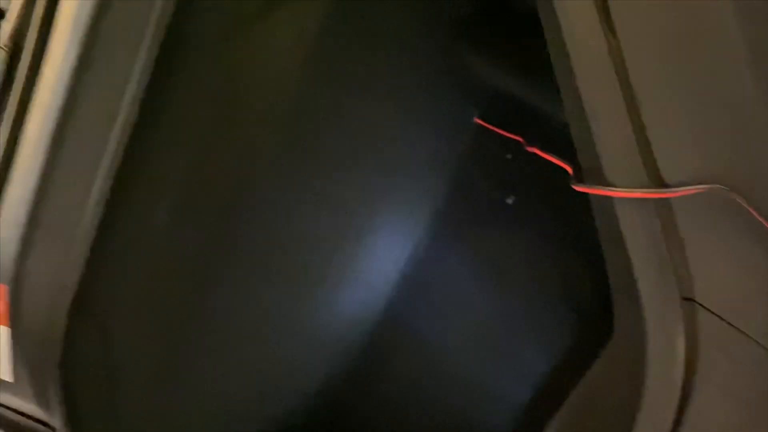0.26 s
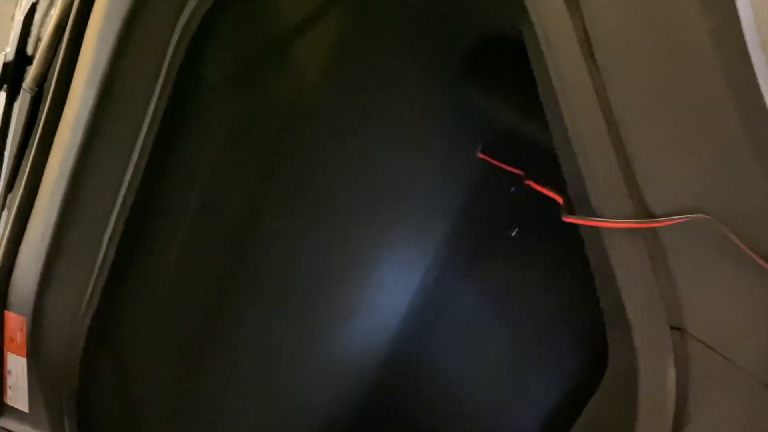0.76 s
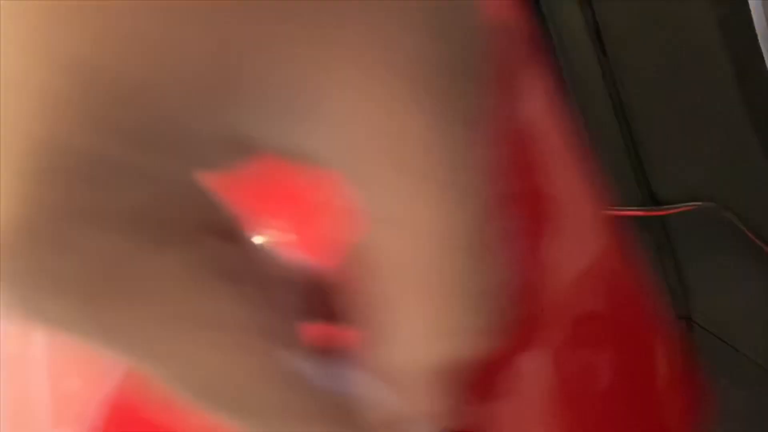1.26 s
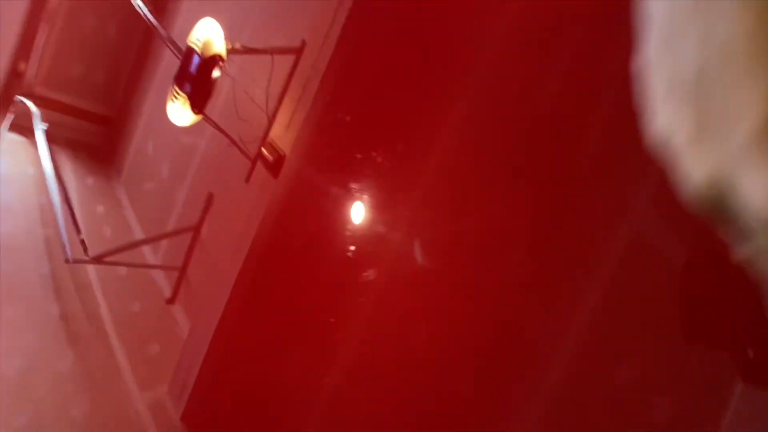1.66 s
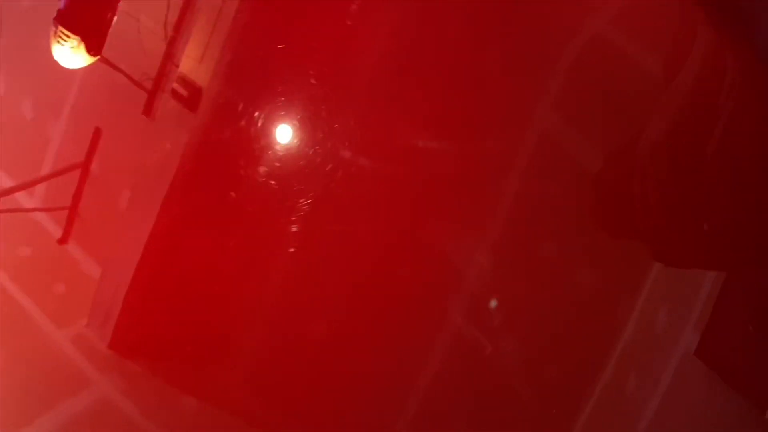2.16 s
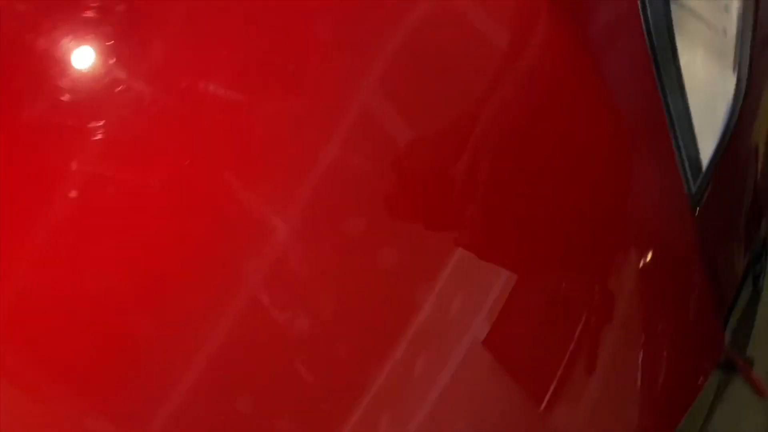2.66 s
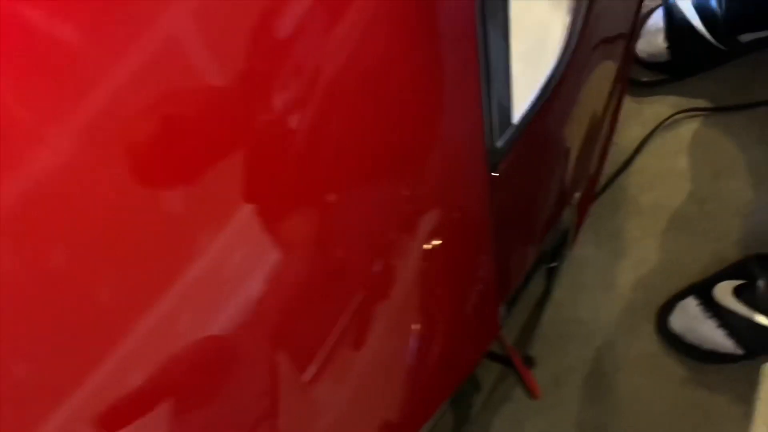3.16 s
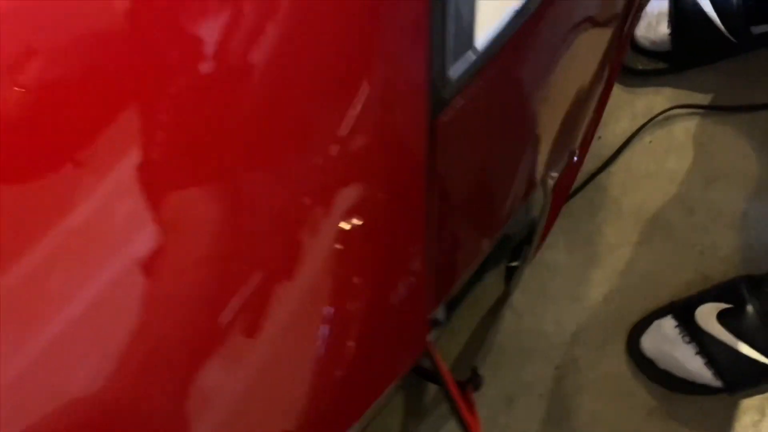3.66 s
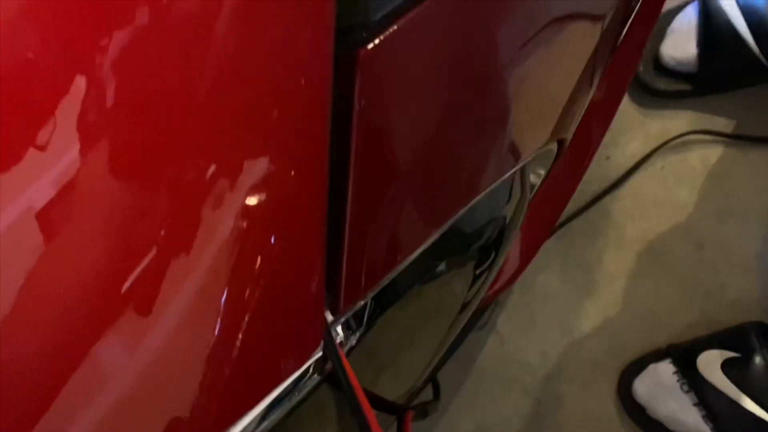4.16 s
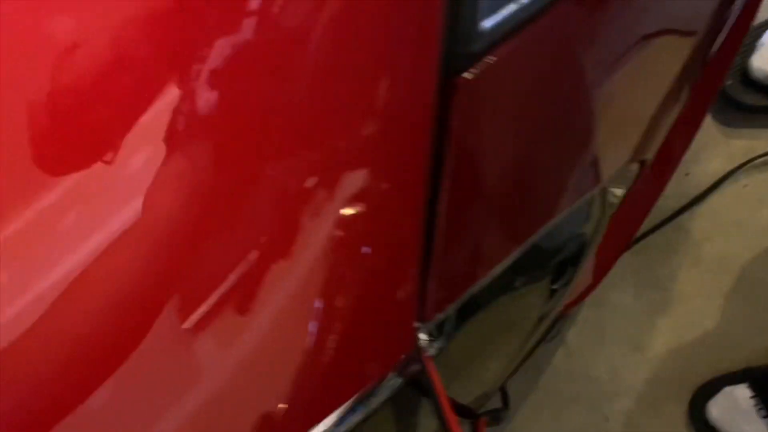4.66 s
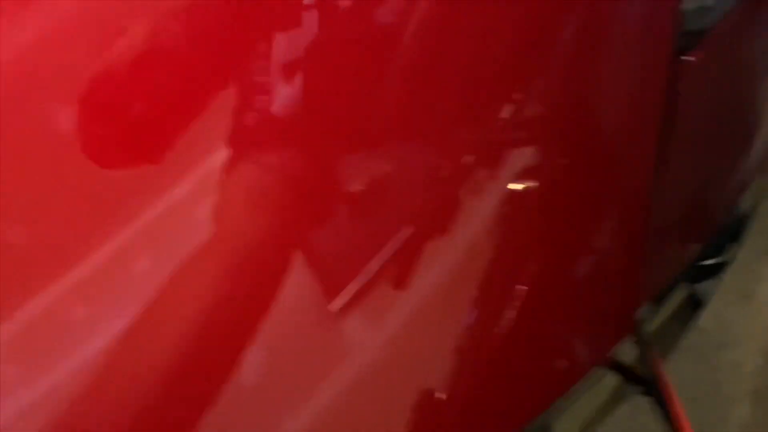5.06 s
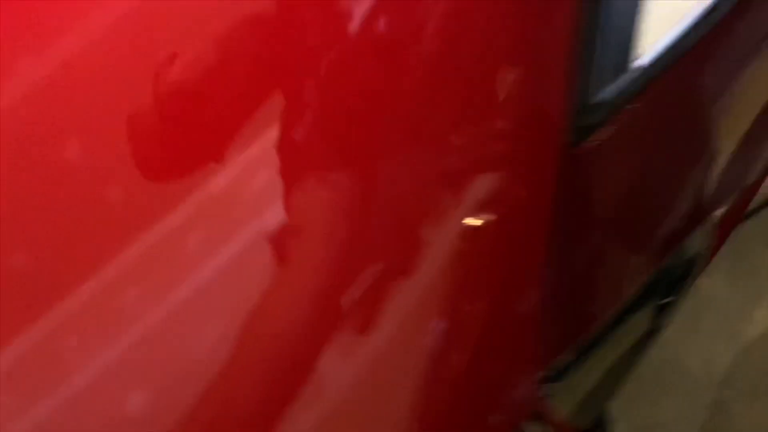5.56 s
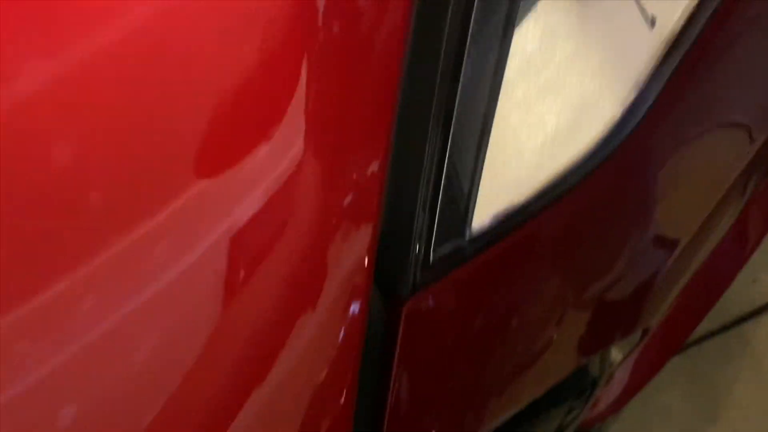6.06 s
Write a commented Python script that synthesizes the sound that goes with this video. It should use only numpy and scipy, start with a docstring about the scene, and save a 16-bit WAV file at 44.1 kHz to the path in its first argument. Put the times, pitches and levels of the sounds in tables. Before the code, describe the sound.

Close, hand-held stereo sound beside a car in a reverberant garage: quiet movement and light knocks, then a bright metal clack as the heavy lid falls, with bouncing thuds and thin sheet-metal ringing. A quieter middle has sleeve hiss, soft low bumps and dry ticks on the microphone. A deeper double latch slam follows, rattling and humming briefly, before one last weaker, dull panel knock and small scuffs.

```python
"""A heavy sheet-metal car lid in a garage, heard from arm's length: it drops onto its catch,
is pushed home with a latch clack and a deep thunk, and takes one more dull knock.
The lid is a sum of damped modes with a noise thud; clacks, taps and ticks are decaying coloured noise.
Clothing, shuffling, low rumble and narrow noise bands swell in bells; fingers bump the hand-held
microphone as gliding sines, and a decaying noise response stands for the garage."""
import sys
import numpy as np
from scipy import signal
from scipy.fft import rfft, irfft
from scipy.io import wavfile
from scipy.ndimage import uniform_filter1d

SR = 44100
rng = np.random.default_rng(int(sys.argv[2]) if len(sys.argv) > 2 else 0)


def persist_wave(psi):
    """Save psi, clipped to +-1, as 16-bit WAV."""
    counts = np.round(np.clip(psi, -1, 1) * 32767).astype(np.int16)
    wavfile.write(sys.argv[1], SR, np.atleast_2d(counts).T)


N = 277830  # length in samples


def undb(db):
    """Logarithmic level: decibels to amplitude gain."""
    return 10 ** (np.asarray(db) / 20)


def over_pitch(hz, points):
    """Spectral interpolation: join (Hz, value) points on a log-frequency axis."""
    at, value = np.transpose(points)
    return np.interp(np.log(np.maximum(hz, 1)), np.log(at), value)


def seconds(length):
    """Uniform sampling: the time axis of the given length."""
    return np.arange(int(length * SR)) / SR


def add(out, start_s, sound):
    """Superposition: mix a sound in at its start time."""
    start = int(start_s * SR)
    part = sound[..., :N - start]
    out[:, start:start + part.shape[-1]] += part


def fade(t, t60):
    """Exponential damping: free decay, 60 dB down after t60."""
    return np.exp(-np.log(1000) * t / t60)


def onset(t, rise_s):
    """Exponential build-up: approach full level with time constant rise_s."""
    return 1 - np.exp(-t / rise_s)


def sweep(hz):
    """Phase accumulation: a sine that follows a changing frequency."""
    return np.sin(2 * np.pi * np.cumsum(hz) / SR)


# Long waves reach both microphone ports alike: pitch_hz [Hz], side_minus_mid_db [dB]
PORT_WIDTH = [(60, -18), (125, -7.5), (250, -9), (500, -4), (1000, 0), (2000, -5), (8000, -1)]


def port_noise(size):
    """Spatial coherence: frequencies and spectra of white noise as the two ports hear it."""
    hz = np.maximum(np.arange(size // 2 + 1) * SR / size, 10)
    mid, side = rfft(rng.standard_normal((2, size)))
    width = undb(over_pitch(hz, PORT_WIDTH))
    return hz, np.array([mid + width * side, mid - width * side]) / np.sqrt(1 + width ** 2)


def noise(size, *colours):
    """Spectral shaping: stereo noise whose level per octave is the sum of the given colours."""
    hz, spectrum = port_noise(size)
    db = sum(over_pitch(hz, colour) for colour in colours)
    equal_octaves = np.sqrt(SR / (2 * np.log(2) * hz))
    return irfft(spectrum * undb(db) * equal_octaves, size)


def flutter(rate):
    """Random modulation: a new random level every 1 / rate s, joined by straight slopes."""
    hold = int(SR / rate)
    steps = np.repeat(rng.standard_normal(N // hold + 1), hold)
    return uniform_filter1d(steps, hold)[:N]


ATTACK_SHARE = .54  # share of a swell's length spent rising


def swells(table, rest_db):
    """Power addition: bell-shaped (s, length, dB) swells rise over the resting level, in dB."""
    t, power = np.arange(N) / SR, undb(rest_db) ** 2
    for peak_s, length_s, db in table:
        width = length_s * np.where(t < peak_s, ATTACK_SHARE, 1 - ATTACK_SHARE)
        power = power + undb(db) ** 2 * np.exp(-2 * ((t - peak_s) / width) ** 2)
    return 10 * np.log10(power)


RING_DB, RING_WIDTH_OCTAVES = 8.5, .3  # how far a contact's own pitch stands out, half-width of its peak


def clicks(table, colour, rise_s, body_hz=450, clack_hz=1800, snap_hz=6500, ripple_db=2.5, count=160):
    """Modal density: a burst of many modes in uneven peaks, around its own pitch if it has one."""
    out, t = np.zeros((2, N)), seconds(1 / 4)
    ripple_hz = np.geomspace(300, 16000, count)
    width = 2 ** RING_WIDTH_OCTAVES
    for start_s, body_db, clack_db, snap_db, t60, *pitch in table:
        hardness = [(body_hz, body_db), (clack_hz, clack_db), (snap_hz, snap_db)]
        ripple = np.column_stack([ripple_hz, ripple_db * (rng.standard_normal(count) - .5)])
        peak = [[(hz / width, 0), (hz, RING_DB), (hz * width, 0)] for hz in pitch]
        crowd = noise(len(t), colour, hardness, ripple, *peak)
        add(out, start_s, crowd * fade(t, t60) * onset(t, rise_s))
    return out


def chirps(table, settle_s, rise_s):
    """Frequency glide: a damped swing moves from its first pitch to its settled one."""
    out, t = np.zeros((2, N)), seconds(1 / 2)
    for start_s, db, first_hz, settled_hz, t60 in table:
        hz = settled_hz + (first_hz - settled_hz) * np.exp(-t / settle_s)
        add(out, start_s, undb(db) * sweep(hz) * fade(t, t60) * onset(t, rise_s))
    return out


def rattle(start_s, body_db, clack_db, snap_db, spread_s=.4, fall_db_per_s=62, t60=.05,
           low_hz=250, high_hz=3000, count=18):
    """Energy loss: contacts at uneven moments, each at its own pitch, tending to weaken with time."""
    moment, weakness, size = rng.random((count, 3)).T
    age = spread_s * (np.arange(count) + moment + 1) / count
    weaker_db = fall_db_per_s * age + 10 * weakness
    pitch = low_hz * (high_hz / low_hz) ** size
    return [(start_s + a, body_db - w, clack_db - w, snap_db - w, t60, hz)
            for a, w, hz in zip(age, weaker_db, pitch)]


def ringing(sound, modes):
    """Resonance: a sound plus the modes that it sets ringing; each port hears them in its own phase."""
    t, response = seconds(1), 0
    for (hz, db, t60), turn in zip(modes, rng.standard_normal(len(modes))):
        port_phase = turn / 2 * np.array([[1], [-1]])
        mode = fade(t, t60) * np.sin(2 * np.pi * hz * t + port_phase)
        response = response + undb(db) * mode * np.sqrt(hz / SR / np.sum(mode[0] ** 2)) * 2
    return sound + signal.fftconvolve(sound, response, axes=1)[:, :N]


# Low rumble swells: shifts of the grip, and at 4.9 s air pushed by the closing lid:
# peak_s [s], length_s [s], level_db [dB, before its colour]
RUMBLE_SWELLS = [(.54, 0.11, -55.5), (.87, 0.18, -56), (1.59, 0.31, -56.5), (2.6, 0.35, -61.5),
                 (3.23, 0.16, -50.5), (3.72, 0.23, -57.5), (4.15, 0.29, -57.5), (4.9, 0.096, -45.5),
                 (5.86, 0.49, -54)]
# Colour of the low rumble: pitch_hz [Hz], level_db [dB per octave]
RUMBLE_COLOUR = [(20, -19.5), (40, 1.5), (60, 5), (110, 1.5), (200, -13), (400, -38), (1000, -63)]
# Shuffles of feet and body beside the car: peak_s [s], length_s [s], level_db [dB, before its colour]
SHUFFLES = [(.3, 1, -58.5), (1.08, 0.54, -59.5), (1.7, 1, -65.5), (2.6, 0.12, -60.5), (3.19, 0.1, -67),
            (3.52, 0.36, -71.5), (4.7, 0.11, -86), (5.87, 0.27, -58)]
# Colour of the shuffles: pitch_hz [Hz], level_db [dB per octave]
SHUFFLE_COLOUR = [(60, -24.5), (180, -3.5), (270, 0.5), (450, -1), (700, -0.5), (1000, -6.5), (1350, -10),
                  (1520, -11.5), (2000, -11.5), (2300, -14), (5000, -22.5), (16000, -45)]
# Strokes of clothing near the microphone, levels before their colours:
# peak_s [s], length_s [s], fine_sleeve_hiss_db [dB], coarser_rub_db [dB]
STROKES = [(.1, 0.96, -78, -96), (1.002, 0.42, -84, -69), (1.504, 0.17, -91, -76), (2.297, 0.5, -67, -85),
           (2.51, 0.2, -60, -64), (2.621, 0.058, -60, -59), (2.78, 0.3, -69.5, -72.5),
           (3.169, 0.46, -78, -75), (3.515, 0.16, -70, -69.5), (3.733, 0.29, -66.5, -72),
           (4.02, 0.12, -67.5, -72.5), (4.313, .04, -81, -74), (4.353, 0.069, -71, -86),
           (4.61, 0.064, -70, -81.5), (4.699, 0.16, -64, -66), (4.909, 0.16, -65, -63),
           (5.332, 0.37, -65.5, -87), (5.53, 0.15, -65.5, -78), (5.668, 0.11, -66.5, -76),
           (5.917, 0.25, -71, -69.5), (6.281, 0.095, -70.5, -71)]
# Colour of the fine sleeve hiss: pitch_hz [Hz], level_db [dB per octave]
SLEEVE_COLOUR = [(300, -30), (1000, -17), (2000, -8), (4000, -3), (7000, -1.5), (10500, 1), (14200, -1.5),
                 (16000, -4)]
# Colour of the coarser rub: pitch_hz [Hz], level_db [dB per octave]
CLOTH_COLOUR = [(200, -18.5), (700, -2), (2000, 0), (4000, -3.5), (8000, -7), (16000, -31.5)]
# What remains between the swells [dB, before the colours]
REST_RUMBLE_DB, REST_SHUFFLE_DB, REST_SLEEVE_DB, REST_CLOTH_DB = -67.5, -84, -87, -87.5


def movement():
    """Modulated noise: shuffling, rustling cloth and low rumble swell as person and closing lid move."""
    rumble_db = swells(RUMBLE_SWELLS, REST_RUMBLE_DB) + 2.8 * flutter(26)
    shuffle_db = swells(SHUFFLES, REST_SHUFFLE_DB)
    sleeve_db = swells([(s, length, hiss) for s, length, hiss, _ in STROKES], REST_SLEEVE_DB)
    cloth_db = swells([(s, length, rub) for s, length, _, rub in STROKES], REST_CLOTH_DB)
    grain_db = 1.6 * flutter(24) + 1.8 * flutter(400)
    rumble = noise(N, RUMBLE_COLOUR) * undb(rumble_db)
    shuffle = noise(N, SHUFFLE_COLOUR) * undb(shuffle_db)
    sleeve = noise(N, SLEEVE_COLOUR) * undb(sleeve_db)
    cloth = noise(N, CLOTH_COLOUR) * undb(cloth_db)
    return rumble + (shuffle + sleeve + cloth) * undb(grain_db)


# Narrow bands of noise: scuffs, and a faint thin hiss near 14 kHz after the slam:
# peak_s [s], length_s [s], level_db [dB per octave at the centre], pitch_hz [Hz], half_width [octaves]
NARROW_NOISES = [(.25, 1, -60, 1280, 0.28), (.35, 0.46, -76, 4100, .6), (0.84, 0.034, -56, 416, 0.36),
                 (1.06, 0.06, -45, 447, 0.61), (1.4, .12, -66, 2050, .35), (1.574, 0.11, -50, 135, 0.96),
                 (2.393, 0.025, -41.5, 8900, 0.38), (3.73, .05, -57.5, 4313, .5),
                 (3.8, 0.046, -60, 2200, .6), (3.995, 0.048, -60, 3505, .9), (4.185, 0.05, -56, 623, 1.2),
                 (5.39, 0.54, -62, 13860, 0.67), (6.245, 0.022, -58, 2200, 1.8)]
BAND_EDGE_DB, BAND_GRAIN_DB = -22.5, 3.5  # level at the edge of the band; unevenness of the level


def narrow_noises():
    """Band-limited noise: scuffs and a thin hiss swell and die unevenly, each in a band of its own."""
    out, grain_db = 0, BAND_GRAIN_DB * flutter(290)
    for peak_s, length_s, db, hz, octaves in NARROW_NOISES:
        width = 2 ** octaves
        lower = [(hz / width ** 2, 3 * BAND_EDGE_DB), (hz / width, BAND_EDGE_DB)]
        upper = [(hz * width, BAND_EDGE_DB), (hz * width ** 2, 3 * BAND_EDGE_DB)]
        band = lower + [(hz, 0)] + upper
        out = out + noise(N, band) * undb(swells([(peak_s, length_s, db)], -140) + grain_db)
    return out


# Small knocks and shuffles about the car, levels before their colour:
# start_s [s], body_db [dB], clack_db [dB], snap_db [dB], t60_s [s], pitch_hz [Hz]
TAPS = [(.025, -58, -54, -58.5, 0.021, 3320), (.09, -45, -61, -52, 0.025, 506),
        (.259, -47, -61, -68, 0.023, 564), (.5205, -47.5, -52, -53, 0.042, 480),
        (.802, -39, -44, -51, 0.084, 448), (.999, -49, -61.5, -57, 0.097, 640),
        (1.011, -39.5, -46, -47.5, 0.059, 620), (1.036, -45, -54.5, -65, 0.16, 450),
        (2.3545, -39.5, -45.5, -57, 0.056, 574), (2.394, -58, -50, -73.5, 0.045, 851),
        (2.615, -54, -55.5, -60, 0.049, 504), (2.755, -62.5, -72, -72.5, 0.035, 500),
        (5.9895, -43, -53, -54.5, 0.072, 350), (6.231, -57.5, -52.5, -67, 0.047, 1310)]
# Their hollow colour: pitch_hz [Hz], level_db [dB per octave]
HOLLOW_COLOUR = [(60, -14), (250, -8), (340, -2), (430, 3), (520, 0), (620, -2), (800, -5), (1200, -4),
                 (1800, -4), (2020, 3), (2200, -5), (7000, 0), (16000, -6)]
# Modes of the hollow body that they set ringing: pitch_hz [Hz], level_db [dB], t60_s [s]
CAVITY_MODES = [(393, -12, .17), (441, -11, .2), (560, -18, .25), (640, -20, .25), (720, -21, .25),
                (1577, -21, .35), (1776, -22, .35), (1975, -18, .25), (2030, -19, .2), (2083, -18, .22)]


def knocks():
    """Cavity resonance: small knocks about the car ring a hollow body."""
    return ringing(clicks(TAPS, HOLLOW_COLOUR, rise_s=.00045), CAVITY_MODES)


# Ticks and brushes right at the microphone, levels before their colour:
# start_s [s], body_db [dB], clack_db [dB], snap_db [dB], t60_s [s]
TICKS = [(3.281, -93, -61, -71, 0.084), (3.421, -63, -59, -82, 0.028), (3.455, -48, -65.5, -85, .05),
         (3.471, -59, -55, -51.5, 0.028), (3.605, -42.5, -53, -59, 0.03), (3.6695, -62.5, -51, -63, 0.067),
         (3.694, -81, -69, -51, 0.016), (3.729, -90.5, -56, -47.5, 0.025), (3.934, -54, -51, -62.5, 0.0095),
         (3.955, -64, -60.5, -72.5, 0.017), (3.971, -72.5, -50.5, -55, 0.0095),
         (4.156, -47.5, -63.5, -89, 0.09), (4.1985, -51.5, -63, -79, 0.11),
         (4.437, -64.5, -59.5, -73, 0.022), (6.264, -92, -58, -58.5, 0.016)]
# Colour of the ticks on the casing: pitch_hz [Hz], level_db [dB per octave]
CASING_COLOUR = [(50, -22.5), (400, -5), (6000, 2.5), (14000, 4.5)]
# Soft bumps of the hand: start_s [s], level_db [dB], first_hz [Hz], settled_hz [Hz], t60_s [s]
BUMPS = [(1.52, -39.5, 157, 100.9, 0.48), (2.629, -32, 134, 59, 0.13), (3.172, -36.5, 153.4, 84.3, 0.39),
         (3.19, -41, 420, 130, 0.078), (3.212, -30.5, 111.2, 88.6, 0.21), (3.424, -42.5, 378, 93.8, 0.16),
         (3.537, -40.5, 272, 79, 0.13), (3.578, -42.5, 308, 87.7, 0.17), (3.673, -31.5, 477, 65.4, 0.059),
         (3.727, -48, 312, 70, 0.1), (3.766, -46, 351, 79.3, 0.071), (3.935, -42, 375, 64.9, 0.21),
         (4.156, -52, 940, 422.6, 0.17), (4.199, -48, 419, 80, 0.22), (4.438, -46, 385, 70.1, 0.16)]


def hand():
    """Contact mechanics: fingers tick on the casing, scuff in tiny catches and bump it; skin roughens bumps."""
    catches = rattle(3.16, body_db=-62, clack_db=-63, snap_db=-71, spread_s=.88, fall_db_per_s=2,
                     t60=.016, low_hz=500, high_hz=4500, count=40)
    regrip = rattle(3.165, body_db=-53, clack_db=-72, snap_db=-88, spread_s=.14, fall_db_per_s=30,
                    t60=.04, low_hz=130, high_hz=400, count=14)
    ticks = clicks(TICKS + catches + regrip, CASING_COLOUR, rise_s=.00039)
    skin_db = 2.5 * flutter(420)
    return ticks + chirps(BUMPS, settle_s=.0058, rise_s=.0047) * undb(skin_db)


# Metal contacts, led by a faint noise swelling just before the first blow, levels before their colour:
# start_s [s], body_db [dB], clack_db [dB], snap_db [dB], t60_s [s], pitch_hz [Hz]
CONTACTS = [(1.914, -38, -56, -61, 0.26, 1180), (1.926, -33, -46, -47.5, 0.78, 8000),
            (1.932, -12.5, -24, -25.5, 0.093, 7800), (1.933, -51, -48, -22, 0.053, 13700),
            (1.9365, -34, -20.5, -28, 0.027, 1770), (1.945, -43, -41, -34.5, 0.32, 9400),
            (1.975, -25, -34, -50, 0.18, 546), (2.005, -22.5, -43.5, -58, 0.24, 1470),
            (2.09, -29.5, -39, -75, 0.12, 300), (2.15, -32.5, -39.5, -77, 0.14, 297),
            (2.218, -37.5, -45.5, -70, 0.12, 344), (2.391, -45, -54, -70, 0.084, 890),
            (4.9105, -31.5, -28, -28.5, 0.045, 2780), (4.9325, -24.5, -36.5, -44, 0.3, 770),
            (4.952, -24, -33, -49, .09, 354), (4.9704, -17, -15.5, -17.5, 0.023, 1970),
            (5.022, -33, -49, -54, 0.11, 1450), (5.05, -34.5, -35.5, -46, 0.15, 550),
            (5.082, -42, -37.5, -46, 0.1, 3250), (5.1, -28.5, -43, -53, 0.14, 227),
            (5.118, -30.5, -50, -48, 0.11, 580), (5.1405, -36, -32.5, -46, 0.074, 2000),
            (5.147, -40, -34, -47, 0.051, 1440), (5.178, -35.5, -61, -55, 0.087, 513),
            (5.2245, -36, -47, -55, 0.18, 243), (5.262, -39.5, -50.5, -63, 0.11, 690),
            (5.3935, -43.5, -56, -70, 0.046, 740), (5.7595, -29, -44.5, -58, 0.034, 810),
            (5.766, -28, -52, -69, 0.077, 602), (5.785, -35, -63, -78, 0.061, 1050),
            (5.823, -32.5, -52.5, -80, 0.033, 1450), (5.843, -39.5, -66, -84, 0.039, 850),
            (5.877, -47, -65, -71, 0.056, 478)]
# Colour of those contacts: pitch_hz [Hz], level_db [dB per octave]
METAL_COLOUR = [(25, -54), (60, -24.5), (200, -3), (350, 0), (550, -0.5), (800, 0), (1100, 0), (1500, 5),
                (2000, 0.5), (2500, 4), (3500, 6), (5000, 4), (7500, 2), (11500, -3.5), (13500, -1),
                (16000, -12.5)]
# Thin, long rings of the sheet metal, set off by every clack: pitch_hz [Hz], level_db [dB], t60_s [s]
SHEET_MODES = [(490, -27, .35), (738, -23, .5), (974, -27, .35), (1163, -27, .38), (1425, -22, .35),
               (1440, -26, .45), (1970, -29, .6), (2099, -28, .55), (2520, -27, .5), (3140, -28, .45),
               (3410, -28, .45), (3865, -28, .28), (4075, -28, .5), (6966, -29, .2), (7300, -27, .2)]
# Short gliding rings of the latch spring:
# start_s [s], level_db [dB], first_hz [Hz], settled_hz [Hz], t60_s [s]
SPRING_RINGS = [(4.933, -17, 1002, 1233, 0.066), (4.942, -27, 949, 739, 0.04)]


def latch():
    """Impact excitation: latch and loose trim clack and ring the sheet metal; the latch spring rings."""
    trim = rattle(1.94, body_db=-22, clack_db=-32, snap_db=-41, t60=.03, count=14)
    trim += rattle(4.98, body_db=-24, clack_db=-33, snap_db=-42, t60=.025, count=14)
    clacks = ringing(clicks(CONTACTS + trim, METAL_COLOUR, rise_s=.00012), SHEET_MODES)
    return clacks + chirps(SPRING_RINGS, settle_s=.0059, rise_s=.00063)


# Lid modes and how hard each kind of blow drives them, before the blow's own level:
# pitch_hz [Hz], t60_s [s], drop_db [dB], slam_db [dB], knock_db [dB]
LID_MODES = [(50, .3, -27, -30, -50), (59, .6, -36, -10, -34), (84, .35, -11, -17, -31),
             (108, .22, -27, -10, -20), (126, .2, -16, -14, -38), (165, .16, -22, -16, -43),
             (197, .17, -12, -22, -42), (225, .11, -16, -16, -31), (268, .2, -13, -25, -37),
             (294, .3, -13, -28, -50), (317, .25, -24, -20, -40), (348, .2, -16, -25, -33),
             (378, .12, -19, -28, -39), (488, .12, -29, -26, -38), (552, .11, -19, -18, -40),
             (577, .13, -20, -28, -26), (690, .13, -33, -33, -36), (800, .16, -33, -38, -42),
             (896, .16, -31, -40, -48), (1045, .16, -37, -37, -45), (1136, .16, -39, -38, -56),
             (1422, .2, -30, -37, -66), (1735, .06, -22, -36, -64), (1975, .035, -30, -19, -64),
             (2110, .04, -35, -28, -66), (3400, .04, -30, -40, -75), (3843, .06, -33, -41, -75),
             (5250, .05, -31, -36, -80), (7250, .03, -22, -38, -80), (13200, .04, -25, -52, -90),
             (13900, .03, -24, -48, -90)]


def panel(mode_db, push_s, travel_s=.0075, swell_cycles=.057, port_lag_s=.00004):
    """Dispersion: modes after one push; travel_s is the time a 100 Hz bending wave takes to cross the lid."""
    t = seconds(.79)
    out = np.zeros((2, len(t)))
    for (hz, t60, *_), db in zip(LID_MODES, mode_db):
        # low bending waves are slower: the clack comes first and falls into the thunk
        arrival = travel_s * np.sqrt(100 / hz)
        age = np.maximum(t - arrival, 0)
        envelope = undb(db) * fade(age, t60) * onset(age, push_s + swell_cycles / hz)
        # each mode radiates from its own part of the panel and reaches one port first
        lag = port_lag_s * rng.standard_normal() * np.array([[1], [-1]])
        out += envelope * np.sin(2 * np.pi * hz * (age - arrival + lag))
    return out


# Blows on the lid: start_s [s], level_db [dB, added to the mode levels], push_s [s], kind (mode levels driven)
BLOWS = [(1.938, 4, 0.00024, "drop"), (1.963, -12, 0.0054, "drop"), (4.905, -7, 0.0075, "slam"),
         (4.943, -24, 0.011, "slam"), (4.9656, 3, 0.00054, "slam"), (5.123, -15, 0.0049, "slam"),
         (5.7628, -0.5, 0.0027, "knock")]
# The crowd of heavily damped swings between the ringing modes:
# pitch_hz [Hz], level_db [dB per octave, before the strongest mode's level and thud_db are added]
THUD_COLOUR = [(25, -65), (45, -33), (90, -9), (160, -6), (240, -2), (340, -1), (450, -11), (580, -9),
               (900, -28), (3000, -60)]


def lid(thud_t60=.092, thud_rise_s=.0031, thud_db=1):
    """Modal superposition: blows and rebounds thud in the panel and leave its modes ringing."""
    out, t = np.zeros((2, N)), seconds(1 / 4)
    mode_db = dict(zip(("drop", "slam", "knock"), np.transpose(LID_MODES)[2:]))
    for start_s, db, push_s, kind in BLOWS:
        thud = noise(len(t), THUD_COLOUR) * fade(t, thud_t60) * onset(t, thud_rise_s + push_s)
        add(out, start_s, undb(db + mode_db[kind].max() + thud_db) * thud)
        add(out, start_s, undb(db) * panel(mode_db[kind], push_s))
    return out


# The whole lid flexes and bounces on its seal:
# start_s [s], level_db [dB], first_hz [Hz], settled_hz [Hz], t60_s [s]
FLEXES = [(1.962, -19, 110, 77.6, 0.35), (2.055, -12.5, 106, 72, 0.087), (2.122, -44, 120, 69, 0.18),
          (2.17, -26, 115, 70, 0.11), (2.218, -27.5, 98.5, 56, 0.12), (4.9725, -4, 402, 110.5, .07),
          (5.058, -15, 130, 89, 0.13), (5.355, -27, 110, 86.3, 0.085), (5.788, -28, 130.5, 97.7, 0.15),
          (5.873, -26.5, 110, 93, 0.16)]


def flexing():
    """Mass on a spring: the whole lid bounces on its seal, each swing falling to its settled pitch."""
    return chirps(FLEXES, settle_s=.0048, rise_s=.0033)


# Swells of the late body resonance: peak_s [s], length_s [s], level_db [dB]
HUM_SWELLS = [(5.32, 0.23, -42.5)]
HUM_HZ, HUM_WAVER_HZ = 316, 6.7  # centre pitch, scale of its random waver


def hum():
    """Frequency modulation: after the slam one body resonance swells briefly, wavering, and dies."""
    hz = HUM_HZ + HUM_WAVER_HZ * flutter(10)
    level_db = swells(HUM_SWELLS, -120) + 2 * flutter(15)
    return undb(level_db) * sweep(hz)


# The garage: pitch_hz [Hz], reverberant_share_db [dB], t60_s [s]
GARAGE_BANDS = [(60.3, -17.5, 1), (120.2, -9, 0.85), (237, -3.5, 0.66), (450, -4.5, 0.57), (990, -3, 0.81),
                (1990, -3, 0.64), (4200, -7, 0.8), (8003, -5.5, 0.28), (15000, -6.5, 0.22)]


def garage(sound, build_s=.0024):
    """Reverberation: hard walls return a dense tail whose decay time depends on pitch."""
    t = seconds(3 / 2)
    hz, spectrum = port_noise(len(t))
    centres, response = np.transpose(GARAGE_BANDS)[0], 0
    for share, (_, db, t60) in zip(np.eye(len(GARAGE_BANDS)), GARAGE_BANDS):
        # neighbouring bands cross-fade on a log-frequency axis
        band = irfft(spectrum * np.interp(np.log(hz), np.log(centres), share), len(t))
        envelope = fade(t, t60) * onset(t, build_s)
        response = response + undb(db) * band * envelope / np.sqrt(np.sum(envelope ** 2))
    return signal.fftconvolve(sound, response, axes=1)[:, :N]


def scene():
    """Direct and reverberant field: lid, latch and taps fill the garage; the hand is close and nearly dry."""
    boom, clack, taps, close = lid(), latch(), knocks(), hand()
    room = garage(undb(-4.0) * boom + undb(-0.5) * clack + undb(2.0) * taps + undb(-14.5) * close)
    struck = boom + flexing() + clack + taps + close
    return struck + room + movement() + narrow_noises() + hum()


TOP_HZ = 15800  # upper limit of the sound


def record(dry, ceiling=.93, low_cut_hz=40):
    """Band limiting and saturation: drop the deepest rumble, round the loudest peaks and cut the top."""
    dry = signal.sosfilt(signal.butter(5, low_cut_hz, "high", fs=SR, output="sos"), dry)
    rounded = dry / (1 + (dry / ceiling) ** 4) ** (1 / 4)
    return signal.sosfilt(signal.ellip(8, .2, 70, TOP_HZ, fs=SR, output="sos"), rounded)


dry = scene()
out = record(dry)
persist_wave(out)
```